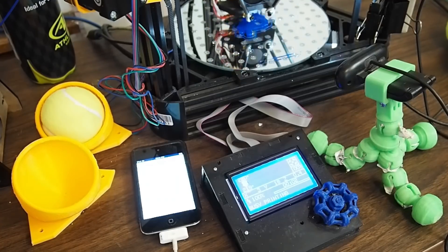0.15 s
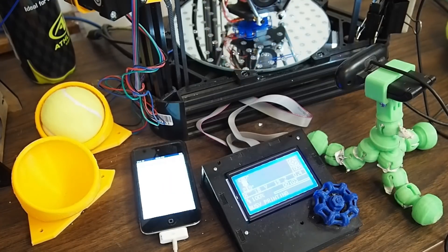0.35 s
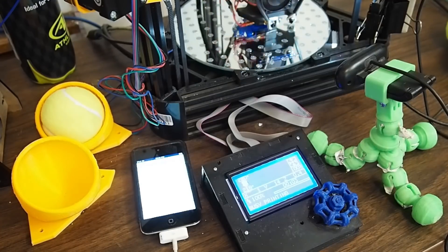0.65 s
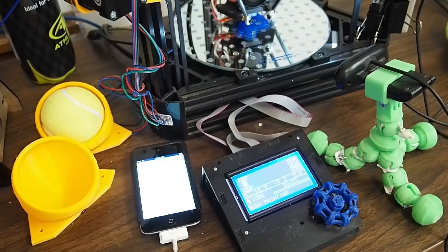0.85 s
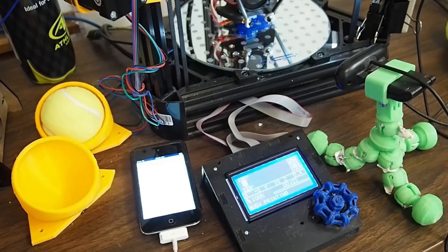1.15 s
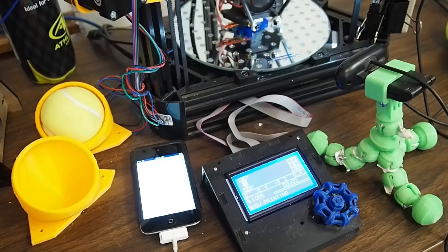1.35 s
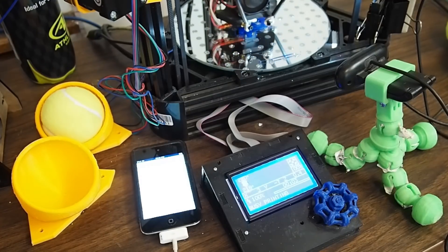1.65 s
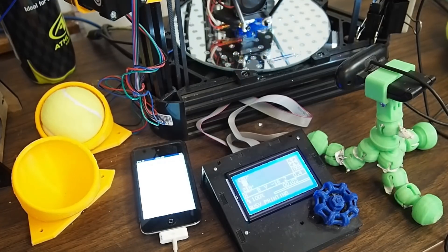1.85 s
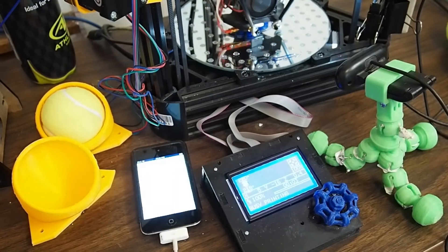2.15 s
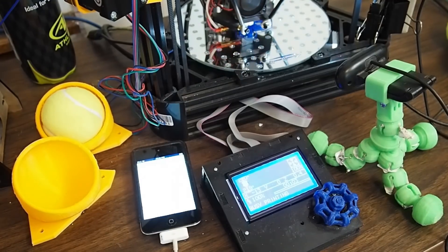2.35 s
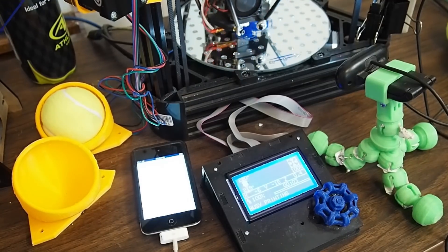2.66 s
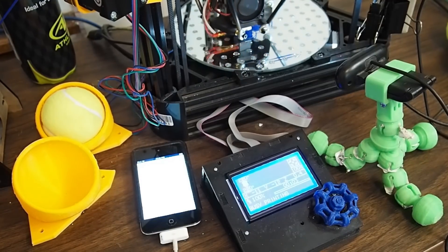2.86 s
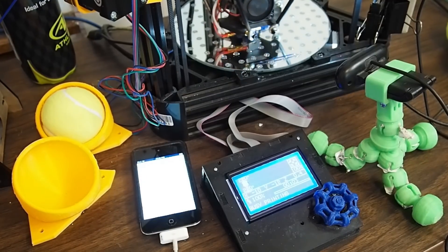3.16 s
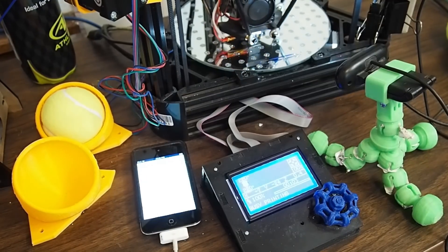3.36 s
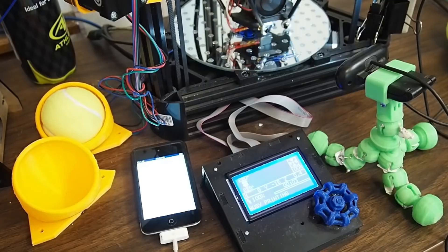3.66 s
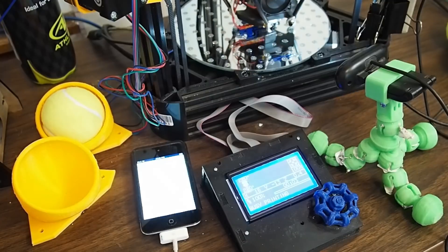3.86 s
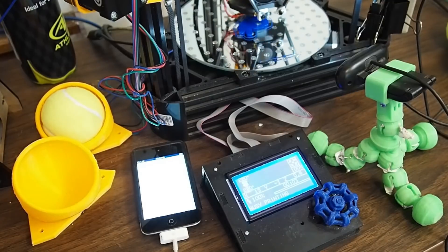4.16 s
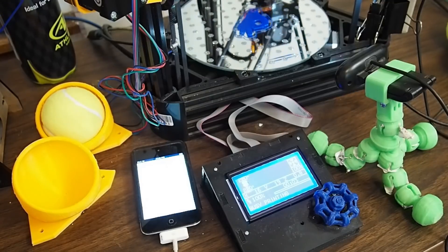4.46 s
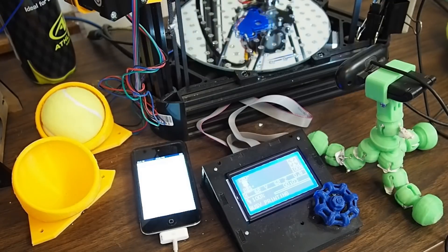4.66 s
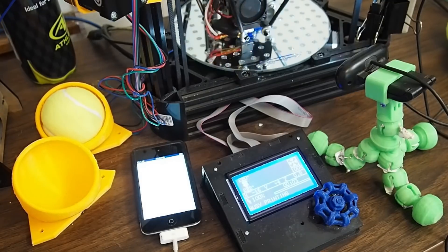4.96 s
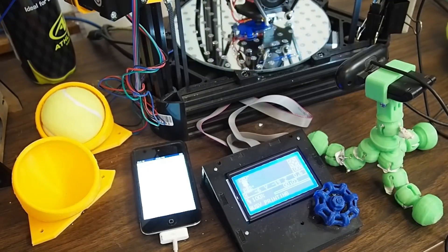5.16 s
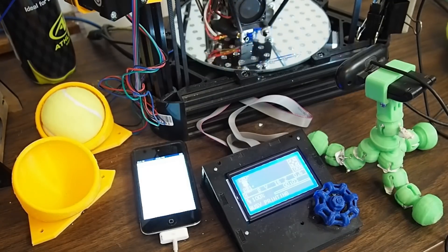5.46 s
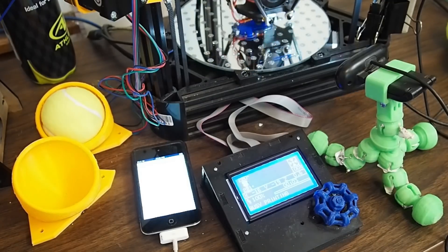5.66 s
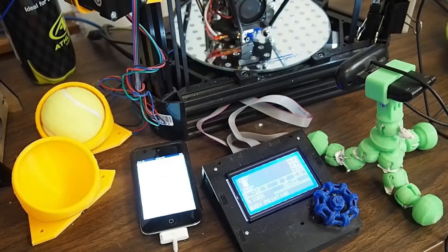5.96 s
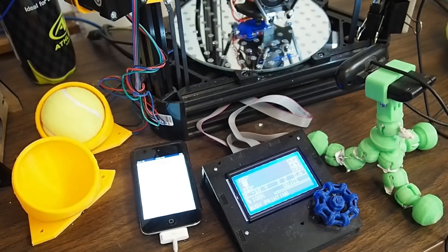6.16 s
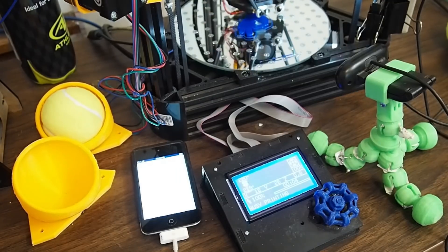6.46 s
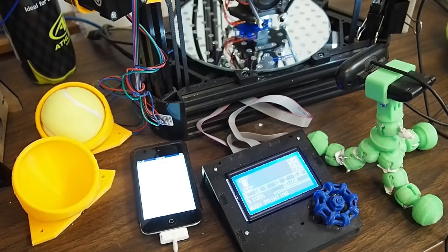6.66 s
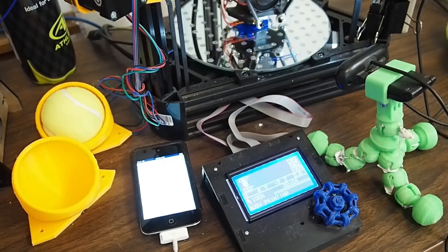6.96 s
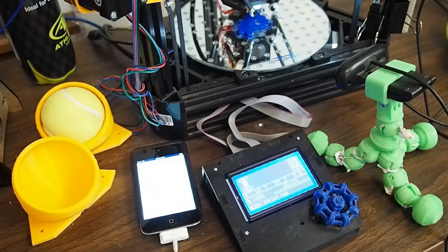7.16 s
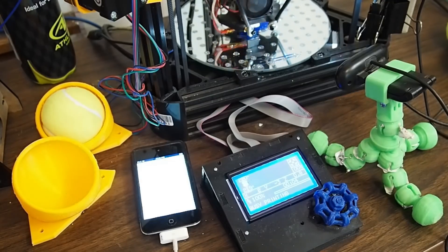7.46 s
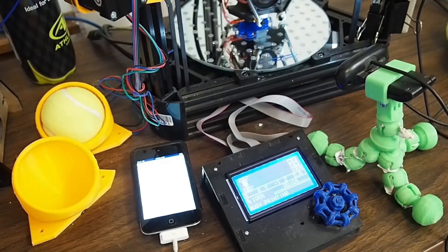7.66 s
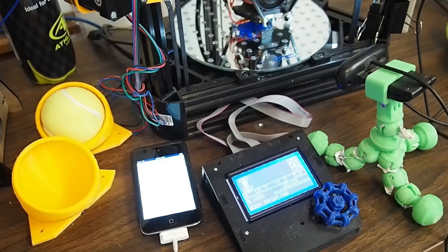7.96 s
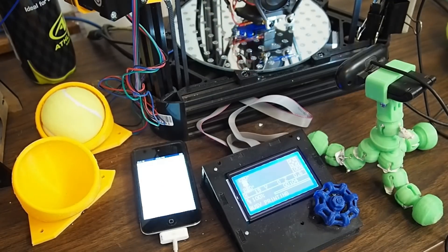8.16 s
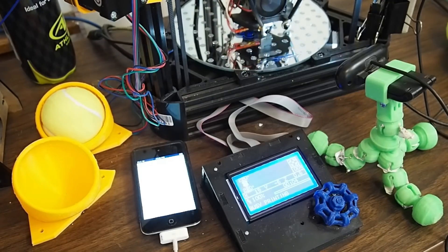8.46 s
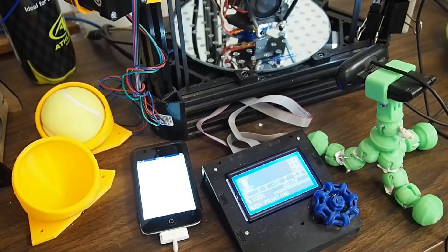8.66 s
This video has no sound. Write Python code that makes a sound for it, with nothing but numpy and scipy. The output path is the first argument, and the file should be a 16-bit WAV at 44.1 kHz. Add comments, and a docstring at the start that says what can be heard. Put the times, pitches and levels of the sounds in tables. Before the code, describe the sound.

A desktop 3D printer works on a wooden table, close to a small, thin-sounding microphone. Its stepper motors buzz and whine in quick repeating sweeps, steady at first, then broken into shorter strokes by abrupt hops with dull thumps. Midway the head makes a long move out and back, one note holding while another glides down and up. Slower zigzags, then faster ones follow. Fans hiss constantly underneath, with little bass and almost no stereo width.

```python
"""A buzzing, whining 3D printer is heard first, in fast sweeps over the steady hiss of small fans.
Three stepper motors speed up and reverse in tiny loops and zigzags: sine notes and rattle ring the frame.
Between strokes come short hops with dull thumps; on a long move out and back one note holds, another glides.
The frame also sings one beaded note, which swells now and then; loose joints click.
Fan air and whistles are filtered noise. All is nearly mono, with a faint diffuse left-right difference."""
import sys
import numpy as np
from scipy import signal
from scipy.fft import rfft, irfft
from scipy.io import wavfile

SR = 44100
rng = np.random.default_rng(int(sys.argv[2]) if len(sys.argv) > 2 else 0)


def dump_mix(stems):
    """Bounce the given channels to the path in sys.argv[1] as a 16-bit WAV at rate SR."""
    frames = np.atleast_2d(stems).T  # one column per channel
    limited = np.clip(frames, -1, 1)  # hard clip at full scale
    pcm = np.round(limited * 32767).astype(np.int16)
    wavfile.write(sys.argv[1], SR, pcm)


N = 388962
TIME = np.arange(N) / SR  # seconds
FREQS = np.maximum(np.arange(N // 2 + 1) * SR / N, 1)  # Hz, kept above zero for the logarithms

# quick hops between strokes: [start t/s, end t/s, relative level/dB, relative thump level/dB]
HOP_MOVES = [(2.744, 2.75, 2.5, 13.5), (3.071, 3.089, -0.5, 12), (3.485, 3.525, -2, 12),
             (3.622, 3.634, -0.2, 14), (4.125, 4.151, -2, 12), (4.31, 4.312, 2, 14),
             (4.345, 4.348, -7, -3.6), (5.32, 5.325, 3.5, 12), (5.814, 5.817, 5.5, 13),
             (6.314, 6.322, -1.5, 10.2), (6.446, 6.451, 0, 12), (6.572, 6.601, -1.5, 12.5),
             (6.764, 6.766, 3, 11), (6.922, 6.927, 3.5, 10.3), (7.076, 7.106, -0.3, 12),
             (7.26, 7.276, -0.5, 12), (7.394, 7.417, -1.5, 12), (8.297, 8.309, -.5, 9)]
# long moves across the bed, out and back: [start t/s, end t/s]
LONG_MOVES = [(4.381, 4.594), (4.613, 4.828)]


def undb(db):
    """Turn decibels into gain."""
    return 10 ** (np.asarray(db) / 20)


def unit(x):
    """Scale to an rms (average strength) of one."""
    return x / np.sqrt(np.mean(x ** 2))


def noise():
    """White noise: equally strong at all frequencies."""
    return rng.standard_normal(N)


def response(points):
    """Gain at every frequency, joined up from (Hz, dB) points."""
    hz, db = np.transpose(points)
    return undb(np.interp(np.log(FREQS), np.log(hz), db))


def bump(hz, width_hz):
    """Gain of one resonance with steep skirts."""
    return 1 / (1 + ((FREQS - hz) / width_hz) ** 2)


def low_cut(hz):
    """Gain of a steep high-pass, which removes the bass."""
    return 1 / np.sqrt(1 + (hz / FREQS) ** 8)


def colour(x, gain):
    """Filter that only looks back in time, so that resonances ring after a blow."""
    # folding the cepstrum (spectrum of the log gain) moves all the ringing after the blow
    cepstrum = irfft(np.log(gain + 1e-9), N)
    cepstrum[1:N // 2] *= 2
    cepstrum[N // 2 + 1:] = 0
    ring = irfft(np.exp(rfft(cepstrum)), N)[:SR // 4]
    return signal.fftconvolve(x, ring)[:N]


def wander(hz):
    """Smooth chance with a spread of one, changing about hz times a second."""
    return unit(irfft(rfft(noise()) * bump(0, hz), N))


def gate(start, end, rise=0.0019, fall=0.0014):
    """One while a move lasts: a short run-up (s), then the vibration dies away (s)."""
    out = np.zeros(N)
    near = slice(*np.searchsorted(TIME, [start, end + .1]))
    run_up = np.clip((TIME[near] - start) / rise, 0, 1)
    out[near] = run_up * np.exp(-np.maximum(TIME[near] - end, 0) / fall)
    return out


def turns(hz):
    """Phase in radians of something that repeats at hz."""
    return 2 * np.pi * np.cumsum(hz * np.ones(N)) / SR


def curve(points):
    """Join (s, value) points by straight lines."""
    return np.interp(TIME, *np.transpose(points))


def rattle(spread_db):
    """Dense tiny impacts of uneven size from belts, pulleys and joints."""
    return unit(noise() * undb(spread_db * noise()))


def voiced(x, gain, treble_gain, split_hz=2900):
    """Give the middle and the treble of a vibration each their own strength."""
    low = irfft(rfft(x) / (1 + (FREQS / split_hz) ** 6), N)
    return low * gain + (x - low) * treble_gain


def frame(x):
    """Motor vibration sets off the resonances of the frame and motor housings."""
    # frame resonances: [f/Hz, half width/Hz, relative level/dB]
    frame_modes = [(542, 36, -18.5), (787, 25, -19), (1067, 118, -16.0), (1274, 58.5, -6.5),
                   (1671, 87, -8.5), (1921, 76, -5.5), (2072, 105, -3), (2386.5, 56.5, 0.9),
                   (2527, 56, -7.5), (2788, 96, -5), (3090, 95, -13), (3295, 83, -12.5), (3520, 45, -17),
                   (3640, 86, -14), (4080, 82, -12.5), (4196, 49, -8), (4354, 96, -14), (4560, 37, -19),
                   (4925, 110, -12.5), (5200, 34, -18)]
    # motor housing resonances: [f/Hz, half width/Hz, relative level/dB]
    housing_modes = [(5475, 92, -13.5), (5720, 54, -15.5), (6150, 59, -10), (6250, 82, -12),
                     (6990, 174, -10), (7640, 120, -14), (7870, 67, -17.5), (8170, 110, -17.5),
                     (8380, 46, -17.5), (8820, 170, -16), (9110, 130, -19), (9100, 36, -24),
                     (9790, 91, -12.5), (9940, 217, -20.5), (10580, 240, -20), (11000, 61, -12),
                     (11730, 330, -19.6), (10700, 85, -11.5), (11930, 165, -11.5), (12700, 220, -14.5),
                     (13538, 210, -26.5), (14000, 67, -17), (14360, 240, -8), (14933, 112, -20),
                     (15190, 168, -11.5), (15557, 141, -20)]
    # broad response beneath the resonances: [f/Hz, relative level/dB]
    frame_body = [(200, -71), (400, -64), (600, -29.5), (950, -27), (1450, -39.5), (1800, -13),
                  (3000, -22.5), (4700, -29.5), (8000, -25.5), (12400, -39.5), (13050, -47), (14000, -29),
                  (15700, -32)]
    power = response(frame_body) ** 2
    for hz, width, db in [*frame_modes, *housing_modes]:
        power = power + (undb(db) * bump(hz, width)) ** 2
    return colour(x, np.sqrt(power))


def stroke_motion():
    """The head's heading in radians, whether it moves, and the level and whine of the current stroke."""
    # printing strokes: [start t/s, end t/s, swings per second/Hz, relative level/dB, relative whine level/dB]
    stroke_moves = [(0, 2.715, 11.15, -2.3, 2.5), (2.781, 3.042, 41, -1.3, -6),
                    (3.118, 3.457, 37, -0.6, -2), (3.555, 3.593, 30, -0.9, -3), (3.665, 4.096, 27, -2.9, 3),
                    (4.181, 4.281, 30, -1.5, -4), (4.85, 5.29, 9, -0.6, -2), (5.357, 5.784, 12, -0.5, -3),
                    (5.846, 6.286, 10, 0.1, -2), (6.35, 6.423, 28, -1.8, -5), (6.481, 6.545, 28, 0.7, -3),
                    (6.633, 6.733, 24, 0, -2), (6.797, 6.895, 24, -0.2, -2), (6.957, 7.048, 24, 1.9, -2),
                    (7.136, 7.231, 24, -1.8, -2), (7.303, 7.366, 28, -0.5, -4), (7.449, 8.271, 27, -2.6, 3),
                    (8.338, 8.82, 16, -1.9, -1)]
    start, end, swing, db, whine_db = np.transpose(stroke_moves)
    row = np.clip(np.searchsorted(start, TIME, side="right") - 1, 0, len(start) - 1)
    angle = np.pi * swing[row] * (TIME - start[row])
    moving = np.minimum(sum(gate(a, b) for a, b in zip(start, end)), 1)
    return angle, moving, db[row], whine_db[row]


def strokes(step_db=-6.5, steep=2.5, half_db=-18.5, quarter_db=-23,
            rattle_db=-3.1, load=0.27, treble_db=-.4, treble_share=.2):
    """Each tower follows the head's direction: its step rate sweeps up and falls to zero at every reversal."""
    # speed of the head, as the top step rate of the busiest motor: [t/s, f/Hz]
    step_rate = [(0, 12500), (.45, 11400), (.85, 11400), (1.8, 12500), (2.18, 12500), (2.27, 10000),
                 (2.7, 10000), (2.85, 12400), (3.2, 9400), (3.7, 12000), (6.4, 12400), (6.5, 15300),
                 (7.2, 15300), (7.5, 10700), (7.65, 14500), (8.25, 14500), (8.35, 10000), (8.82, 12000)]
    angle, moving, db, whine_db = stroke_motion()
    top_hz = curve(step_rate)
    step = undb(whine_db + step_db)
    drive = 0
    # three motors: lag in half turns, and share of the top step rate
    for lag, reach in [(0, 1), (.27, .69), (-.27, .68)]:
        speed = np.abs(np.cos(angle + np.pi * lag))
        phase = turns(top_hz * reach * speed * (1 + .025 * wander(500)))
        whine = step * speed ** steep * np.sin(phase)
        # uneven microsteps repeat every two and four steps
        whine = whine + undb(half_db) * np.sin(phase / 2)
        whine = whine + undb(quarter_db) * np.sin(phase / 4)
        belt = undb(rattle_db) * speed ** load * rattle(spread_db=5)
        drive = drive + reach * (speed ** 2 * whine + belt)
    # a harder stroke swells the middle more than the treble
    return voiced(drive, moving * undb(db), moving * undb(treble_db + treble_share * db))


def sings(hz=2402, scatter_hz=24, waver=.011, beads_hz=46, uneven=.35, scatter_db=3.4, sing_db=1.0):
    """The main resonance sings in uneven beads at irregular moments, each with its pitch and strength."""
    # note of the frame's main resonance during strokes, before sing_db is added: [t/s, level/dB]
    sing_level = [(0, -40), (0.84, -38), (1.08, -43), (1.9, -39), (2.7, -40), (2.8, -45), (3.04, -47),
                  (3.24, -35), (3.4, -56), (3.67, -39), (3.79, -47), (4.03, -38), (4.28, -53), (7.36, -55),
                  (7.5, -41), (8.25, -46), (8.82, -36)]
    _, moving, _, _ = stroke_motion()
    phase = turns(beads_hz * np.exp(uneven * wander(30)))
    bead = (phase / (2 * np.pi)).astype(int)  # number of the current bead
    note = turns(hz * (1 + waver * wander(120)))
    detune, strength = rng.standard_normal((bead[-1] + 1, 2))[bead].T
    swelling = np.abs(np.sin(phase / 2)) * undb(scatter_db * np.tanh(strength))
    beads = swelling * np.sin(note + turns(scatter_hz * detune))
    return unit(beads) * moving * undb(curve(sing_level) + sing_db)


def fans(air_db=-39.5, flutter_db=1):
    """Air hiss that flutters a little, with narrow wavering whistles."""
    # colour of the fan air: [f/Hz, relative level/dB]
    fan_air = [(80, -34), (150, -66), (250, -32), (420, -28), (530, -14.5), (750, -16.5), (1180, 1.5),
               (1500, -12), (2000, -3), (3200, -3), (5000, -8.5), (12000, -11), (13000, -10), (14200, -15)]
    # fan whistles: [f/Hz, width/Hz, level/dB]
    fan_whistles = [(1213, 75, -62.5), (3968, 71, -56), (14600, 60, -64)]
    sound = colour(noise(), response(fan_air)) * undb(air_db + flutter_db * wander(4.7))
    for hz, width, db in fan_whistles:
        whistle = irfft(rfft(noise()) * bump(hz, width) ** 2, N)
        sound = sound + undb(db) * unit(whistle)
    return sound


def hops(hop_db=-1, zip_db=-9, zip_hz=1350, end_hz=650, treble_db=-1.4, treble_share=.2):
    """A hop is a short hard burst of rattle with a low motor note that falls as the head brakes."""
    gain, treble_gain, pitch = 0, 0, 0
    for start, end, db, _ in HOP_MOVES:
        burst = gate(start, end, rise=0.00095, fall=0.0033)
        gain = gain + burst * undb(db)
        treble_gain = treble_gain + burst * undb(treble_db + treble_share * db)
        braking = np.interp(TIME, [start, end], [1, .5])
        pitch = pitch + gate(start, end, rise=0.000988, fall=.006) * braking
    note_hz = (end_hz + (zip_hz - end_hz) * pitch) * (1 + 0.152 * wander(506))
    note = np.sin(turns(note_hz))
    return undb(hop_db) * voiced(rattle(spread_db=7) + undb(zip_db) * note, gain, treble_gain)


def thumps(hz=515, t60=0.073, thump_db=-57, start_db=-2, long_db=10, bend=0.35, settle=0.0028):
    """Starting and braking jolt the frame; the pitch drops onto its lowest mode."""
    jolts = np.zeros(N)
    age = np.arange(SR // 8) / SR  # seconds since the jolt
    phase = 2 * np.pi * np.cumsum(hz * (1 + bend * np.exp(-age / settle))) / SR
    # t60: seconds to fade by 60 dB
    ring = np.sin(phase) * undb(-60 * age / t60) * (1 - np.exp(-age * 1000))
    for start, end, _, db in HOP_MOVES:
        jolts[int(start * SR)] += undb(db + start_db)
        jolts[int(end * SR)] += undb(db)
    # leaving on the first long move, and stopping after the last
    for s in (LONG_MOVES[0][0], LONG_MOVES[-1][1]):
        jolts[int(s * SR)] += undb(long_db)
    return undb(thump_db) * signal.fftconvolve(jolts, ring)[:N]


def swells(hz=2410, length=.008):
    """The note of the main resonance briefly swells and fades."""
    # swells of the main resonance: [t/s, peak level/dB]
    swell_peaks = [(3.083, -25), (3.135, -30), (4.137, -27), (6.166, -28)]
    loudness = sum(undb(db) * np.exp(-((TIME - s) / length) ** 2) for s, db in swell_peaks)
    return loudness * np.sin(turns(hz))


def crossings(cruise_hz=1636, cruise_db=-13, overtone_db=-19.5, rough_db=-11.5, rattle_db=-7.5,
              hiss_db=-1, home_db=-3.8, far_db=-.3, ease=1.45, flare_hz=2850, flare_width_hz=500,
              flare_db=4.2, meeting_db=-6.5, octave_db=-9, gliding_db=-19):
    """One note holds, another glides down and back; a rough emphasis rises and falls across its overtones."""
    # gliding note: [at home f/Hz, at the far side f/Hz]
    gliding_ends = (2250, 937)
    # centre of the rough emphasis: [at home f/Hz, at the far side f/Hz]
    rough_ends = (2000, 5350)
    # share of the way still between the head and the far side: out on the first move, back on the second
    way = np.interp(TIME, np.ravel(LONG_MOVES), [1, 0, 0, 1])
    gliding_hz = gliding_ends[1] * (gliding_ends[0] / gliding_ends[1]) ** way
    nearness = np.cos(np.pi / 2 * way ** ease) ** 2
    rough_hz = rough_ends[0] + (rough_ends[1] - rough_ends[0]) * nearness
    # louder towards the far side, and where the rough emphasis passes flare_hz
    flare = flare_db * np.exp(-((rough_hz - flare_hz) / flare_width_hz) ** 2)
    db = far_db + (home_db - far_db) * way + flare
    cruise = turns(cruise_hz * (1 + .006 * wander(80)))
    gliding = turns(gliding_hz * (1 + .005 * wander(300)))
    rough = turns(rough_hz * (1 + .1 * wander(500)))
    drive = undb(cruise_db) * np.sin(cruise)
    drive += undb(overtone_db) * sum(np.sin(k * cruise) for k in (4, 5, 7))
    for k in range(2, 12):
        # overtones of the gliding note flare up near the centre of the emphasis or its octave
        meeting = 0
        for n, size_db in [(1, meeting_db), (2, octave_db)]:
            gap_hz = k * gliding_hz - n * rough_hz
            meeting = meeting + undb(size_db) * np.exp(-(gap_hz / 650) ** 2)
        drive += (meeting * rough_hz / rough_hz.max() + undb(gliding_db) / k) * np.sin(k * gliding)
    # a strongly wavering tone fills the emphasis; it follows the level twice, here and below
    drive += undb(rough_db + db) * np.sin(rough)
    drive += undb(rattle_db) * voiced(rattle(spread_db=0.5), 1, undb(hiss_db))
    return drive * undb(db) * sum(gate(a, b) for a, b in LONG_MOVES)


def clicks(click_db=-24, decay=0.0017, hz=6000, width_hz=3500, knock=.6):
    """Loose joints click: sharp bright ticks of noise with a small knock and little bass."""
    # clicks: [t/s, relative level/dB]
    click_times = [(4.8204, -6), (7.2718, -0.5), (7.2762, -10)]
    blows = sum(undb(db) * gate(s, s, rise=.00005, fall=decay) for s, db in click_times)
    tone = (bump(hz, width_hz) + knock * bump(1600, 600)) * low_cut(700)
    return undb(click_db) * colour(2 * noise() * blows, tone)


def scene(motor_db=-18.0, diffuse_t60=0.6):
    """The printer is nearly mono, with a faint diffuse difference between left and right."""
    # left-right difference against the middle: [f/Hz, relative level/dB]
    side_colour = [(100, -10.5), (300, -3), (550, -13.5), (1000, -16.5), (2200, -62), (4500, -55),
                   (8000, -35.5), (14000, -19)]
    motors = undb(motor_db) * frame(strokes() + hops() + crossings())
    mid = motors + thumps() + sings() + swells() + clicks() + fans()
    age = np.arange(SR // 4) / SR
    # decaying noise smears the sound; diffuse_t60 is the seconds to fade by 60 dB
    smear = rng.standard_normal(len(age)) * np.exp(-np.log(1000) * age / diffuse_t60)
    diffuse = signal.fftconvolve(mid, smear / np.linalg.norm(smear))[:N]
    side = colour(diffuse, response(side_colour))
    return np.array([mid + side, mid - side])


def record(dry, bass_hz=150, top_hz=15750):
    """The small microphone loses the bass and the recorder cuts the top steeply."""
    bass_cut = signal.butter(4, bass_hz, "high", fs=SR, output="sos")
    top_cut = signal.ellip(10, .2, 80, top_hz, fs=SR, output="sos")
    thin = signal.sosfilt(bass_cut, dry)
    return signal.sosfilt(top_cut, thin)


dry = scene()
out = record(dry)
dump_mix(out)
```